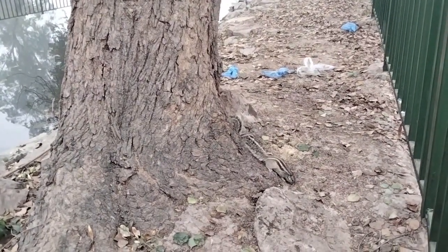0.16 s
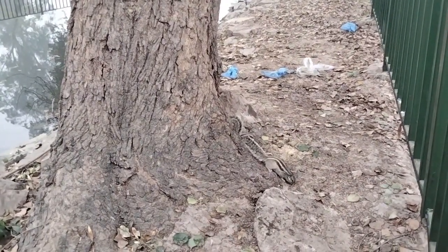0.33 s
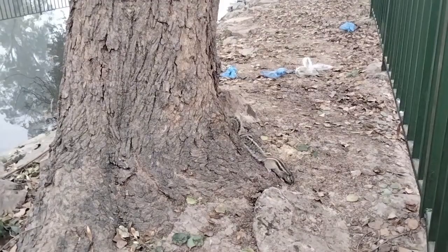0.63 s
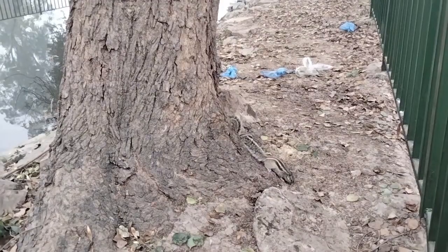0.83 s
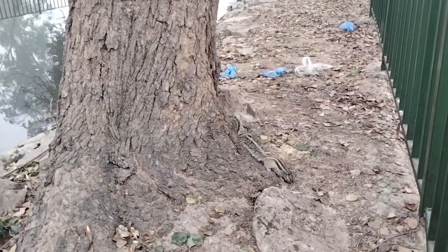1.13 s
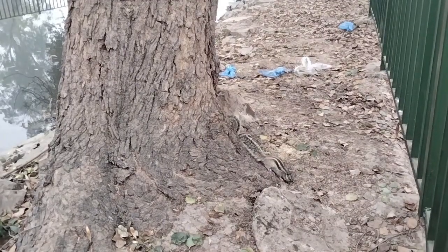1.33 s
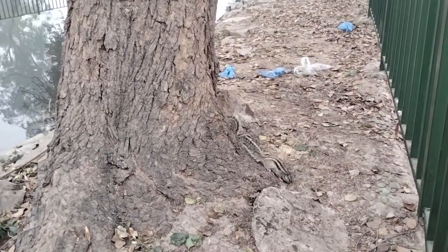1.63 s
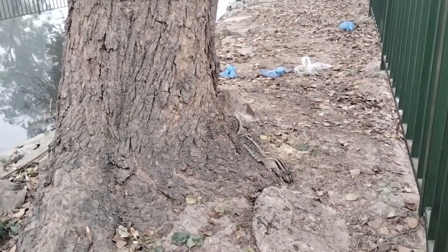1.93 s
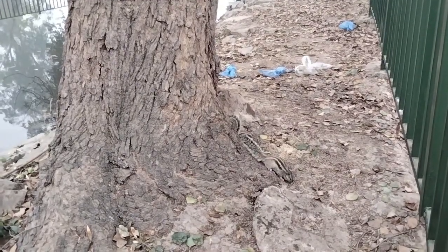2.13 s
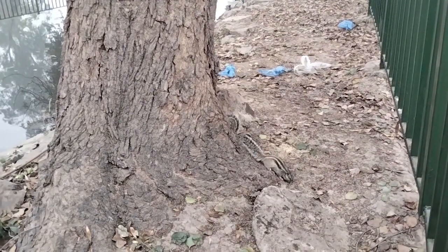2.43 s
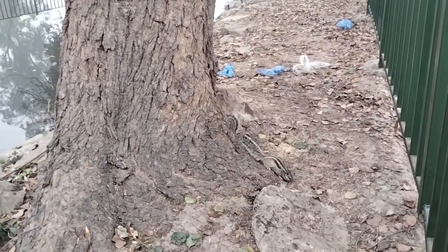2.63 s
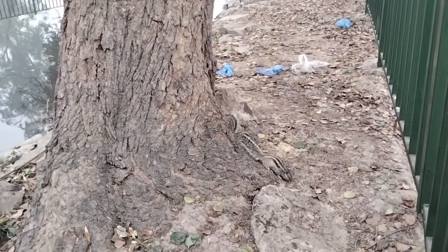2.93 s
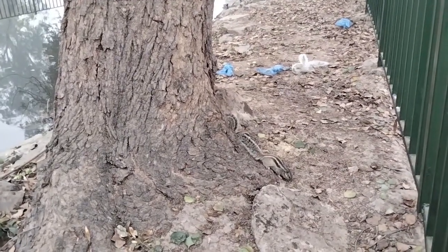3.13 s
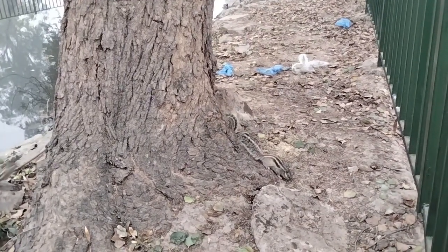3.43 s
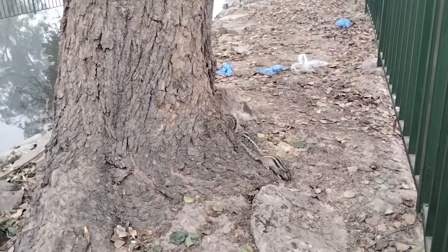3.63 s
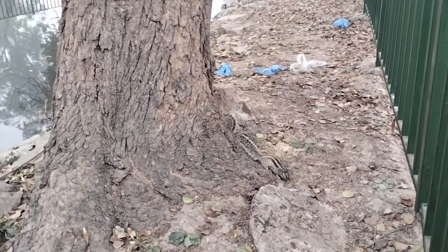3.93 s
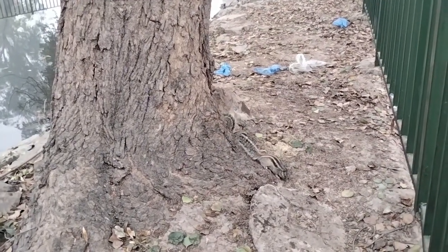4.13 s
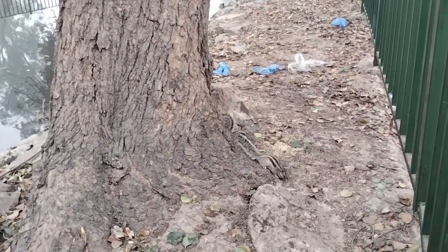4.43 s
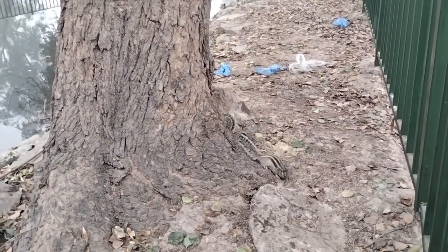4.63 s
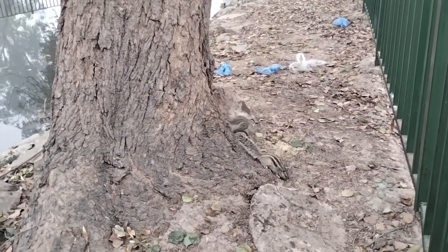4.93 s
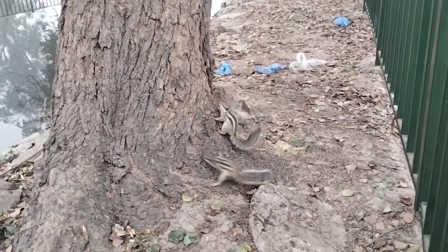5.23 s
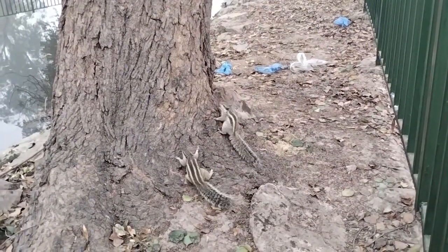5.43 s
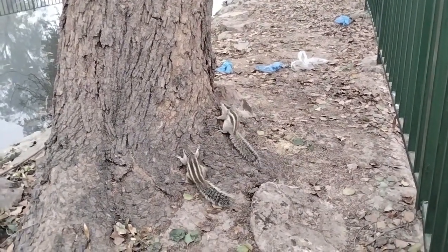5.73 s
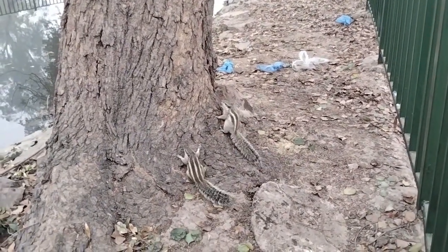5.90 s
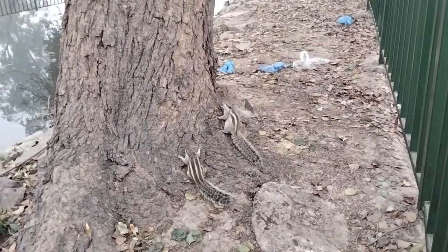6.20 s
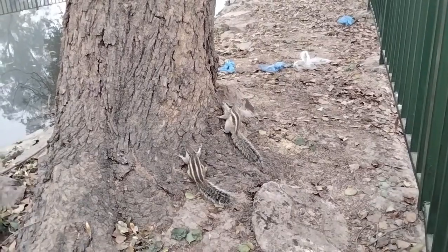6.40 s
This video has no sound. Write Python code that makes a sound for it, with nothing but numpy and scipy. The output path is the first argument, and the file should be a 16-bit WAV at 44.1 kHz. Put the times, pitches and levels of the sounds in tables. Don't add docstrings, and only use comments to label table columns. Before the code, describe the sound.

Outdoors by a tree and a sheet fence, a squirrel a few metres away gives bright, very high chirps in regular pairs, each a tiny click flipping up to a short whistle. Far crows caw hoarsely in bursts, busiest in the middle. A bird whistles twice, leaves tick, and soft city hum lies beneath. A small microphone catches a bright reflective tail.

```python
import sys
import numpy as np
from scipy import signal
from scipy.fft import rfft, irfft
from scipy.io import wavfile
from scipy.ndimage import uniform_filter1d, minimum_filter1d

SR = 44100
rng = np.random.default_rng(int(sys.argv[2]) if len(sys.argv) > 2 else 0)


def unload_audio(sound):
    columns = np.transpose(np.atleast_2d(sound))
    steps = np.round(np.clip(columns, -1, 1) * 32767)
    wavfile.write(sys.argv[1], SR, steps.astype(np.int16))


def voltage_ratio(decibels):
    exponent = np.asarray(decibels, float) / 20
    return 10 ** exponent


N = 289296
LEAD = 8000


def evened(x):
    return x / np.sqrt(np.mean(x ** 2) + 1e-20)


def read(points, hz):
    f, value = np.transpose(points)
    return np.interp(np.log(hz + 1), np.log(f + 1), value)


def over_time(points):
    return np.interp(np.arange(N) / SR, *np.transpose(points))


def add(mix, s, sound):
    at = round(s * SR)
    sound = sound[max(-at, 0):]
    part = mix[max(at, 0):][:len(sound)]
    part += sound[:len(part)]


def band(x, lo_hz, hi_hz):
    return signal.sosfilt(signal.butter(3, [lo_hz, hi_hz], "band", fs=SR, output="sos"), x)


def resonate(x, hz, width_hz):
    turn = np.exp(2j * np.pi * np.cumsum(hz) / SR)
    r = np.exp(-np.pi * width_hz / SR)
    return 2 * (turn * signal.lfilter([1 - r], [1, -r], x / turn)).real


def wash(spectrum, level_db, patchy_db):
    hz = np.fft.rfftfreq(1024, 1 / SR)
    a, b, patches = rng.standard_normal((N // 256 + 5, 513, 3)).T
    patches = uniform_filter1d(patches, size=14, axis=0)
    patches = evened(uniform_filter1d(patches, size=16, axis=1))
    z = (a + 1j * b) * voltage_ratio(read(spectrum, hz)[:, None] + patchy_db * patches)
    x = signal.istft(z, nperseg=1024, noverlap=768)[1][:N]
    return evened(x) * voltage_ratio(level_db)


# time in seconds, level in dB.
TRAFFIC_LEVEL = [(0, -60), (1.7, -62), (2.1, -60), (3.05, -57.5), (4.05, -58), (4.4, -63.5), (6.56, -63.5)]
# frequency in Hz, level in dB per Hz.
HUM_COLOUR = [(12, -31), (22, -1.5), (138, 3.5), (277, -10), (607, -13.5), (976, -8.5), (2200, -10),
              (2700, -42)]
# frequency in Hz, level in dB per Hz.
AIR_COLOUR = [(1500, -40), (2600, -2), (5080, 4), (8650, 2), (10200, -33), (14700, -36), (16000, -37)]


def city():
    traffic_db = over_time(TRAFFIC_LEVEL)
    hum = wash(HUM_COLOUR, traffic_db, patchy_db=1.5)
    air = wash(AIR_COLOUR, traffic_db - 17.5, patchy_db=4.0)
    engine = resonate(rng.standard_normal(N), np.full(N, 83.8), width_hz=8.5)
    return hum + air + voltage_ratio(traffic_db - 10) * evened(band(engine, 50, 140))


# time in seconds, level in dB.
FLOCK_LEVEL = [(0, -54.5), (.45, -55.5), (1.09, -53.5), (1.41, -55.5), (1.99, -53), (2.45, -46.5),
               (2.9, -55.5), (3.1, -57.5), (3.4, -56.5), (3.7, -66), (4.0, -58.5), (4.2, -57), (4.45, -50),
               (4.75, -51.5), (5.1, -61), (5.52, -64.5), (5.76, -59.5), (6.56, -57.5)]
# frequency in Hz, level in dB per Hz.
CHATTER_COLOUR = [(410, -21), (700, -16.5), (1100, -2), (1570, -1.5), (2000, -0.5), (2500, -5.5),
                  (3250, -19.5), (5500, -120)]
# frequency in Hz, level in dB per Hz.
TWITTER_COLOUR = [(1900, -44.5), (2500, 2.5), (3200, 0), (4000, -2), (4800, -39)]


def far_flock():
    flock_db = over_time(FLOCK_LEVEL)
    twitter_db = -62.5 + 1.68 * (flock_db + 55)
    chatter = wash(CHATTER_COLOUR, flock_db, patchy_db=4.0)
    return chatter + wash(TWITTER_COLOUR, twitter_db, patchy_db=5.0)


# start in seconds, level in dB, hold in seconds,
# duller part in dB.
RUSTLES = [
    (0.174, -49, 0.28, -15.5),
    (5.042, -60, 0.13, -27.5),
]
# time in seconds, level in dB.
TICKS = [(0.0992, -47), (0.6094, -50), (0.7472, -56), (3.685, -60), (5.9853, -76), (6.3695, -53.5),
         (6.3997, -43), (6.4288, -51), (5.1, -50), (5.2584, -44), (5.2615, -46), (5.153, -47),
         (5.1572, -46), (5.165, -48), (5.184, -48), (5.197, -49), (5.236, -46), (5.278, -48), (6.3767, -54),
         (6.423, -56), (6.48, -66), (6.5159, -68), (.2558, -38), (.64, -56), (.658, -58), (.685, -62),
         (1.356, -50), (6.082, -57.5), (6.496, -56)]


def leaves():
    out = np.zeros(N)
    rise_s, fall_s, range_db = 0.11, 0.099, 30
    crackle_per_s, crackle_db = 350, 3.5
    for s, level_db, hold_s, body_db in RUSTLES:
        t = np.arange(0, rise_s + hold_s + fall_s, 1 / SR)
        opening = np.clip(np.minimum(t / rise_s, (t[-1] - t) / fall_s), 0, 1)
        db = level_db - range_db * (1 - opening)
        noise = rng.standard_normal(SR)[:len(t)]
        chance = rng.random(SR)[:len(t)]
        size = rng.exponential(1, SR)[:len(t)]
        snaps = (chance < crackle_per_s / SR) * voltage_ratio(crackle_db * size)
        noise = noise * (1 + signal.lfilter([1], [1, -.97], snaps))
        thin = evened(band(band(noise, 11300, 16000), 11100, 15400))
        body = evened(band(noise, 5300, 8400))
        add(out, s, voltage_ratio(db) * (thin + voltage_ratio(body_db) * body))
    for s, db in TICKS:
        tick = rng.standard_normal(300) * np.exp(-np.arange(300) / 40)
        add(out, s, voltage_ratio(db) * band(tick, 12000, 17000))
    return out


# seconds after the turn, share of the top pitch.
SWOOP = [(0, 0.99), (.006, 0.97), (.016, .87), (.03, .735), (.045, .63), (.062, .565), (.1, .52), (.2, .47)]


def whistle(turn_s, lead_s, first_hz, hold_s, level_db):
    top_hz, droop_hz_per_s, droop_s = 5480, 20000, 0.056
    loud_at_s, loud_for_s = 0.037, 0.033
    t = np.arange(-lead_s, hold_s + droop_s, 1 / SR)
    before = np.maximum(-t, 0) / lead_s
    droop = np.maximum(t - hold_s, 0)
    hz = top_hz * np.interp(t, *np.transpose(SWOOP))
    hz = hz - (top_hz - first_hz) * before ** 2.6 - droop_hz_per_s * droop
    soft_db = np.where(t < loud_at_s, -10, -9) * (1 - np.exp(-((t - loud_at_s) / loud_for_s) ** 4))
    accent_db = 5 * np.exp(-((t - .008) / 0.0057) ** 2)
    db = level_db + soft_db + accent_db - 9 * before ** 4 - 8 * droop / droop_s
    return turn_s - lead_s, hz, db


def squeak(s, length_s, first_hz, last_hz, level_db):
    u = np.arange(0, length_s, 1 / SR) / length_s
    return s, last_hz + (first_hz - last_hz) * (1 - u) ** 2.0, level_db - 6 * u ** 2


# turn at the top in seconds, lead-in in seconds, first pitch in Hz,
# seconds from the turn to the final droop, level in dB.
WHISTLES = [
    (3.738, 0.066, 4624, 0.115, -41.5),
    (4.23, 0.086, 4970, 0.105, -43),
]
# start in seconds,
# length in seconds, first and last pitch in Hz, level in dB.
SQUEAKS = [(3.39, .07, 2480, 2010, -52), (.895, 0.025, 5000, 3600, -53.5), (.952, 0.0403, 3280, 2860, -44),
           (2.84, 0.043, 6600, 10000, -51), (.908, 0.047, 3560, 3470, -45), (4.695, .03, 3150, 2750, -59)]
# level in dB, lowest and highest frequency in Hz that sounds.
OVERTONES = [(2.5, 100, 7400), (-11, 100, 11300), (-25, 11800, 17300), (-24, 13400, 15600)]


def bird():
    out = np.zeros(N)
    calls = [whistle(*row) for row in WHISTLES] + [squeak(*row) for row in SQUEAKS]
    for s, hz, db in calls:
        turn = 2 * np.pi * np.cumsum(uniform_filter1d(hz, size=350)) / SR
        tone = 0
        for k, (overtone_db, low_hz, top_hz) in enumerate(OVERTONES, 1):
            sounds = np.clip(np.minimum(top_hz - k * hz, k * hz - low_hz) / 600, .03, 1)
            beak = 1 - 1.1 * np.exp(-((k * hz - 9400) / 1200) ** 4)
            effort = voltage_ratio((k > 1) * 1.8 * (db - db.max() + 2.0))
            tone = tone + voltage_ratio(overtone_db) * np.sin(k * turn) * sounds * beak * effort
        uneven_db = 2.5 * evened(uniform_filter1d(rng.standard_normal(len(hz)), size=300))
        add(out, s, np.sqrt(2) * voltage_ratio(db + uneven_db) * tone * signal.windows.tukey(len(hz), .08))
    return out


def caw(row, manner):
    s, length_s, level_db, mid_hz, pitch_hz = row
    width_hz, rough, rasp_db, sag, fade_db = manner
    u = np.arange(0, length_s, 1 / SR) / length_s
    db = level_db + fade_db * u ** 2
    throat_hz = mid_hz * (1 + sag * (.5 - u))
    wobble, drift, noise, lump = rng.standard_normal((4, SR // 3))[:, :len(u)]

    unsteady = .03 * rough * evened(uniform_filter1d(wobble, size=300))
    unsteady = unsteady + .005 * evened(uniform_filter1d(drift, size=2500))
    turns = np.cumsum(pitch_hz * (1 + unsteady)) / SR
    harmonics = range(3, int(7000 / pitch_hz))
    folds = evened(sum(np.cos(2 * np.pi * k * turns + k * k) for k in harmonics))
    puffs = evened((.4 + np.exp(-(turns % 1) / .3)) * noise)
    drive = (1 - np.clip(rough, 0, 1)) * folds + rough * puffs

    throat = resonate(resonate(drive, throat_hz, width_hz), throat_hz, 2.64 * width_hz)
    reach_hz = min(1.8 * mid_hz, 16000)
    throat = band(band(throat, 400, reach_hz), 400, reach_hz)

    rasp_hz = 6300 + 900 * evened(uniform_filter1d(drift[::-1], size=1800))
    rasp = resonate(puffs + 0.037 * folds, rasp_hz, 2800)
    rasp = evened(band(band(rasp, 3100, 8500), 2840, 10500))
    rasp += voltage_ratio(-29) * evened(band(band(puffs, 10600, 13500), 10600, 13500))

    lumps = voltage_ratio(2.5 * evened(uniform_filter1d(lump, size=700)))
    jolts = voltage_ratio(2.0 * wobble[np.floor(turns).astype(int)])
    rasp_level = voltage_ratio(rasp_db + 0.05 * (level_db + 38))
    voice = lumps * evened(throat)
    voice = voice + rasp_level * np.sin(np.pi * u) * lumps[::-1] ** 1.48 * jolts * rasp
    return s, voltage_ratio(db) * voice * signal.windows.tukey(len(db), .65)


A_HZ, B_HZ, C_HZ, D_HZ = 331.5, 203.5, 522, 321
# start in seconds, length in seconds, level in dB, throat in Hz,
# pitch or pulse rate in Hz. First the calls with a high throat.
HIGH_CAWS = [(.905, 0.079, -40.5, 3440, 343), (.97, 0.11, -46.5, 3170, 351),
             (2.09, 0.096, -49.5, 2800, 320.4), (2.18, 0.088, -47.5, 2650, 337),
             (2.24, 0.17, -41, 3000, D_HZ), (2.33, 0.16, -41.5, 3100, D_HZ),
             (2.46, 0.12, -40.5, 2760, D_HZ), (2.87, 0.098, -45, 2460, 315),
             (3.165, 0.21, -39.5, 3040, 321.5), (3.3, 0.11, -37.5, 2930, 324.8),
             (4.34, 0.15, -40.5, 2970, C_HZ), (4.42, 0.18, -39, 3180, C_HZ),
             (4.52, 0.16, -40.5, 3080, C_HZ), (4.64, 0.09, -41, 2800, 525), (2.63, 0.14, -45.5, 4720, 330),
             (.905, 0.12, -51, 4250, 350), (3.335, 0.051, -45, 2790, 326)]
SHARP_CAWS = [(2.45, 0.32, -47, 3740, 324.6), (2.6, 0.19, -35, 4250, 334.6), (2.74, 0.22, -40, 3880, A_HZ),
              (3.93, 0.15, -54, 4700, 331), (4.02, 0.12, -57.5, 3850, 326), (4.7, 0.13, -43, 4940, 346),
              (4.78, 0.067, -43.5, 4370, A_HZ)]
LOW_CAWS = [(2.59, .12, -40.5, 2010, B_HZ), (2.28, 0.1, -44, 2080, 325), (2.34, 0.27, -48.5, 1780, D_HZ),
            (2.65, 0.14, -43, 1730, 324.4), (2.9, 0.11, -45, 2010, 328.5), (3.25, 0.14, -56.5, 1610, 324.4),
            (4.02, 0.051, -52, 1320, D_HZ)]
FAR_CAWS = [(0, 0.12, -54, 1740, 311), (.9, 0.088, -51, 1150, 295), (.96, 0.12, -48.5, 1330, 293.4),
            (.95, 0.17, -56, 2300, 326), (1.05, 0.096, -50, 1720, 297), (3.085, 0.18, -42, 1640, 191.8),
            (4.02, 0.18, -55, 1440, 322), (4.84, 0.23, -57.5, 1550, 326.6), (5.53, 0.051, -54, 2190, 369),
            (5.99, 0.053, -60, 2640, 383), (6.07, 0.048, -59, 3300, 383), (.08, 0.21, -59, 1000, 323),
            (3.84, 0.19, -55, 3460, 327.5), (6.36, 0.2, -64, 3400, 360)]
CLEAR_CAWS = [(2.535, 0.091, -35, 1810, B_HZ), (2.735, 0.089, -33, 3030, A_HZ),
              (2.81, 0.096, -32.5, 2810, A_HZ), (2.78, 0.088, -37, 4070, A_HZ),
              (2.78, 0.098, -43.5, 1670, A_HZ), (4.56, 0.16, -48.5, 1320, D_HZ)]
SEEPS = [(1.98, .13, -70, 6200, 423), (3.09, 0.2, -51.5, 7330, 710), (4.11, 0.075, -55.5, 8000, 464),
         (4.19, 0.09, -55.5, 10900, 415), (.93, 0.16, -53, 6400, 423), (1.616, .12, -77, 7700, 420)]
HISSES = [(2.33, .32, -66.5, 10600, 321), (2.66, .31, -57, 12700, 330), (3.15, .28, -59.5, 11800, 325),
          (4.42, .3, -61, 11500, 520), (4.27, .2, -63, 12000, 520), (4.69, .15, -64, 12100, 340),
          (2.24, .13, -66, 12000, 320)]
PURE_CAWS = [(2.35, .15, -39.5, 2950, 300), (2.37, 0.18, -43, 3270, 327.5), (2.47, 0.076, -39.5, 2500, 325),
             (2.54, 0.078, -43.5, 1880, B_HZ), (2.72, 0.12, -37, 3980, A_HZ),
             (2.87, 0.069, -37.5, 2540, 290), (2.735, 0.067, -48, 1280, A_HZ),
             (2.3, 0.054, -41.5, 1950, 240), (4.39, 0.12, -49, 1480, C_HZ), (4.54, 0.12, -46.5, 1590, C_HZ),
             (4.69, 0.16, -42.5, 1610, A_HZ), (4.69, 0.099, -53.5, 2680, D_HZ),
             (4.44, 0.091, -48, 3000, C_HZ), (4.56, 0.061, -40, 3110, C_HZ), (4.68, 0.048, -45, 4300, D_HZ),
             (3.19, 0.21, -40.5, 3250, 324), (2.8, 0.13, -46.5, 3500, 400), (2.82, 0.055, -45, 4300, A_HZ),
             (2.72, 0.13, -53.5, 5400, A_HZ), (2.33, .15, -50.5, 1570, D_HZ)]
# frequency in Hz, level in dB.
CALL_COLOUR = [(7400, 0), (8700, -3.5), (9600, -24.5), (10300, -24.5), (11100, 2), (12400, -2.5),
               (13600, -3), (16000, -10)]


def crows():
    out = np.zeros(N)
    # throat width in Hz, roughness 0-1, rasp in dB, throat sag as a share, fade in dB
    for rows, manner in [(HIGH_CAWS, (465, 0.7, -9, 0.06, -4)),
                         (SHARP_CAWS, (1270, 0.62, -0.34, 0.21, -1)),
                         (LOW_CAWS, (309, 0.7, -14, -0.64, 2.5)),
                         (FAR_CAWS, (317, 0.84, -27.5, 0, -0.5)),
                         (CLEAR_CAWS, (350, 0.3, -7.5, 0.018, -6)),
                         (SEEPS, (650, 1.0, -45, 0.06, -3)),
                         (HISSES, (1500, 1.0, -45, 0.08, -3)),
                         (PURE_CAWS, (178, 0.36, -37, 0.005, -3.5))]:
        for row in rows:
            add(out, *caw(row, manner))
    colour = voltage_ratio(read(CALL_COLOUR, np.fft.rfftfreq(N, 1 / SR)))
    return band(irfft(rfft(out) * colour, N), 850, 15500)


def chirp(row, shape, second_db, third_db, puff_db, lead_in, shut):
    s, chip_db, chip_hz, whistle_db, top_hz = row
    glide, delay_s, quick, quick_s, abrupt, slow, slow_s, rise_s, fade_s = shape
    t = np.arange(-.006, .07, 1 / SR)

    turn = 2 * np.pi * np.cumsum(chip_hz * (1 + glide * np.clip(t - .0015, -.0015, .005))) / SR
    swell = np.exp(-.5 * ((t - .0015) / 0.0011) ** 2)
    swell += lead_in * np.exp(-.5 * ((t + 0.0008) / 0.0015) ** 2)
    swell += lead_in * np.exp(-.5 * ((t - .0042) / .001) ** 2)
    chip = np.sin(turn) + voltage_ratio(second_db) * np.sin(2 * turn) + voltage_ratio(third_db) * np.sin(3 * turn)
    air = band(rng.standard_normal(len(t)), 5100, 11200)
    chip += voltage_ratio(-20) * air
    chip += voltage_ratio(-12.5) * band(rng.standard_normal(len(t)), 13200, 17000)

    u = np.maximum(t - delay_s, 0)
    drop = np.clip((u - .024) / .007, 0, 1)
    climb = quick * np.exp(-(u / quick_s) ** abrupt) + slow * np.exp(-u / slow_s)
    hz = top_hz * (1 - climb - .4 * drop ** 2)
    turn = 2 * np.pi * np.cumsum(hz) / SR
    tone = np.sin(turn)
    tone += voltage_ratio(-5.0) * np.sin(2 * turn) * np.exp(-(u / 0.004) ** 2)
    tone += voltage_ratio(puff_db) * air * np.exp(-(u / 0.0058) ** 2)
    breath = (1 - np.exp(-u / rise_s)) ** 2 * np.exp(-u / fade_s) * (1 - drop) ** 2 * voltage_ratio(3.0)
    breath *= 1 - shut * np.clip((9900 - hz) / 500, 0, 1)
    return s - .006 + LEAD / SR, voltage_ratio(chip_db - 1.0) * swell * chip + voltage_ratio(whistle_db) * breath * tone


# time in seconds, chip level in dB, chip pitch in Hz,
# whistle level in dB, whistle top in Hz. First the pair whose tail still rings at the start.
EARLIER = [
    (-.12, -15, 5160, -31, 10800),
    (-.03, -29.5, 4370, -21.5, 9870),
]
HIGH_CHIRPS = [(0.389, -28, 4870, -30.5, 10880), (0.835, -29, 4960, -32.5, 10860),
               (1.279, -27, 4960, -33.5, 10870), (1.758, -29, 4950, -33, 10880),
               (2.1677, -27.5, 4940, -34, 10630), (2.690, -25, 4840, -31, 10840),
               (3.1092, -29.5, 4870, -34, 10500), (3.325, -29.5, 4980, -31.5, 10930),
               (3.806, -25, 4990, -33, 10660), (4.280, -25, 4910, -31, 10850),
               (4.709, -27.5, 5060, -33.5, 10910), (5.1307, -29.5, 4930, -32, 10870),
               (5.6025, -28.5, 4880, -34, 10900), (6.172, -29.5, 4920, -33, 10900)]
LOW_CHIRPS = [(0.4833, -28, 4490, -20.5, 10010), (0.9116, -29, 4560, -19.5, 9720),
              (1.3746, -28, 4600, -23.5, 10090), (1.853, -30, 4620, -23, 9870),
              (2.257, -27.5, 4510, -22, 9550), (2.775, -23, 4300, -20, 9790),
              (3.4257, -29.5, 4690, -24, 10430), (3.902, -32, 4540, -22.5, 9930),
              (4.364, -28.5, 4420, -19, 9700), (4.787, -33, 4420, -19, 9690),
              (5.215, -28.5, 4520, -23, 9650), (5.684, -26, 4426, -18.5, 9760),
              (5.7888, -31, 4410, -23.5, 9860), (6.259, -27.5, 4500, -22, 9630)]
# chip glide per second, delay in seconds, quick climb as a share, its seconds,
# its abruptness, slow climb as a share, its seconds, rise in seconds, fade in seconds.
HIGH_SHAPE = (23, .0019, .25, .0043, 2.5, .11, .014, .003, .013)
LOW_SHAPE = (36, .004, .19, .0016, 1, .17, .006, .0026, .0075)


def squirrel():
    out = np.zeros(LEAD + N)
    for row in EARLIER[:1] + HIGH_CHIRPS:
        add(out, *chirp(row, HIGH_SHAPE, second_db=-43, third_db=-24, puff_db=-3, lead_in=0.24, shut=.42))
    for row in EARLIER[1:] + LOW_CHIRPS:
        add(out, *chirp(row, LOW_SHAPE, second_db=-5, third_db=-18.5, puff_db=-10.5, lead_in=.14, shut=0))
    return out


# frequency in Hz, time in seconds.
YARD_T60 = [(1000, 0.2), (3500, 0.32), (5000, 0.24), (7500, 0.26), (9600, 0.26), (15000, 0.31)]
# frequency in Hz, level in dB.
YARD_RETURN = [(2000, -1), (5000, -7.5), (7000, 1.5), (10900, 1.5), (11400, -21), (12400, -31.5),
               (13200, -11), (15500, -8)]
# delay in seconds, level in dB.
ECHOES = [(.0045, 0.5), (.0095, -4.5), (0.018, -8), (0.022, -10.5), (.031, -34), (0.051, -32)]


def yard(x, swell_s, linger, echo_db):
    taps = np.zeros((2, SR))
    at = np.arange(200, SR - 16, 16) + rng.integers(0, 16, (2, (SR - 201) // 16))
    strength = rng.standard_normal(at.shape) * voltage_ratio(2.5 * rng.standard_normal(at.shape))
    np.put_along_axis(taps, at, strength, 1)
    hz, t, z = signal.stft(taps, SR, nperseg=128)
    decay_db = read(YARD_RETURN, hz) - 60 * t[:, None] / (linger * read(YARD_T60, hz))
    swell = (1 - np.exp(-t / swell_s)) * (1 + .6 * np.exp(-t / .05))
    tail = signal.istft(z * voltage_ratio(decay_db.T) * swell, SR, nperseg=128)[1]
    tail /= np.linalg.norm(tail[0])
    for s, db in ECHOES:
        tail[0, round(s * SR)] += voltage_ratio(db + echo_db)
    ears = tail[0] + voltage_ratio(-31) * np.outer([1, -1], band(tail[1], 3500, 16000))
    return signal.fftconvolve(x[None], ears, axes=1)[:, :len(x)]


def scene():
    near, far, whistler = squirrel(), crows(), bird()
    near_tail = voltage_ratio(-0.48) * yard(near, swell_s=0.14, linger=0.91, echo_db=-10.5)[:, LEAD:]
    far_tail = yard(voltage_ratio(-4.5) * far + voltage_ratio(1.5) * whistler, swell_s=0.038, linger=1.0, echo_db=-18)
    floor = city() + far_flock()
    return near[LEAD:] + far + whistler + floor + leaves() + near_tail + far_tail


def masked(x):
    hz, _, z = signal.stft(x, SR, nperseg=1024)
    power = uniform_filter1d((abs(z) ** 2).mean(0), size=12, axis=0)
    power = uniform_filter1d(power, size=3, axis=1)
    loudest = -minimum_filter1d(-power, size=161, axis=0)
    treble = (hz > 8800) & (hz < 12700)
    faint = (power < loudest * voltage_ratio(2 * -35)) & treble[:, None]
    return signal.istft(z * np.where(faint, voltage_ratio(-30), 1), SR, nperseg=1024)[1][:, :N]


def low_pass(x):
    return signal.sosfilt(signal.butter(12, 16820, fs=SR, output="sos"), x)


def record(dry):
    haze_hz = 12500
    loudness = np.sqrt(abs(uniform_filter1d(band(dry[0], 8600, 11000) ** 2, size=60)))
    noise = rng.standard_normal((2, N))
    middle, side = evened(band(band(noise, haze_hz, 18000), haze_hz, 18000))
    haze = voltage_ratio(-28.0) * loudness * (middle + voltage_ratio(-16.5) * np.outer([1, -1], side))
    edge = signal.firwin(255, 15830, window=("kaiser", 7), fs=SR)
    mix = signal.oaconvolve(masked(dry + haze), edge[None], "same", axes=1)
    return low_pass(mix)


dry = scene()
out = record(dry)
unload_audio(out)
```